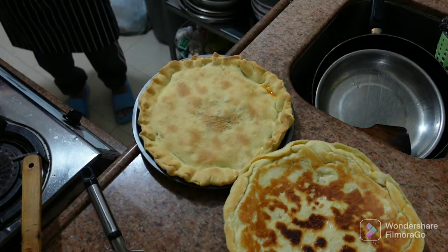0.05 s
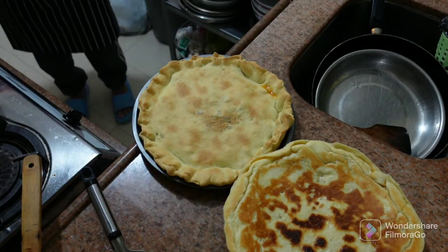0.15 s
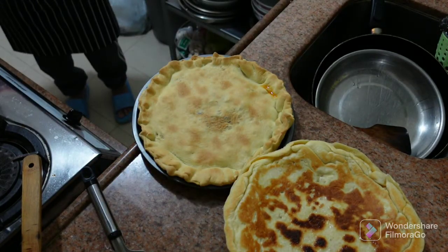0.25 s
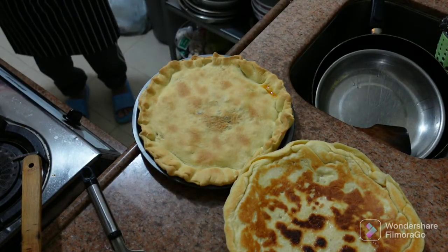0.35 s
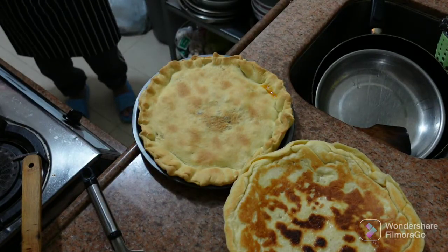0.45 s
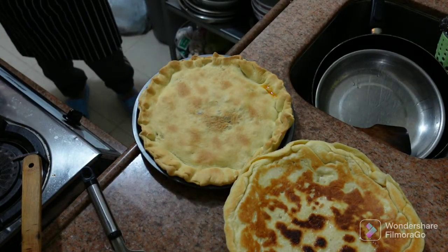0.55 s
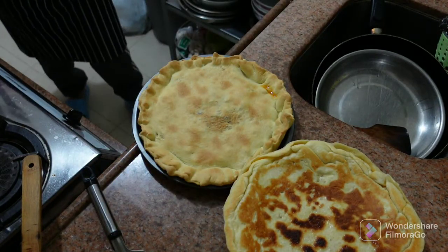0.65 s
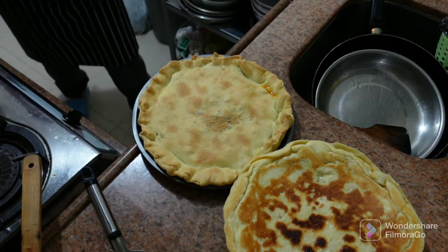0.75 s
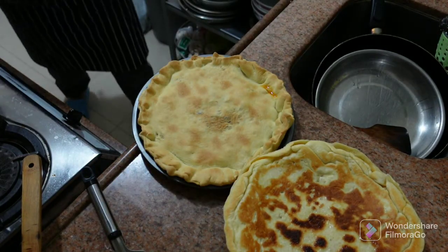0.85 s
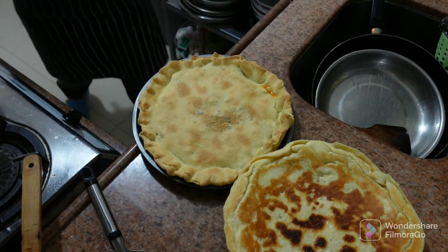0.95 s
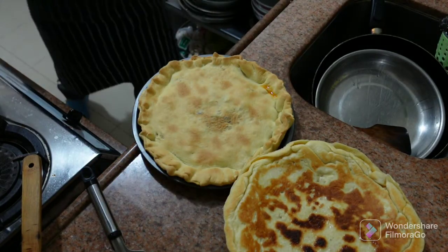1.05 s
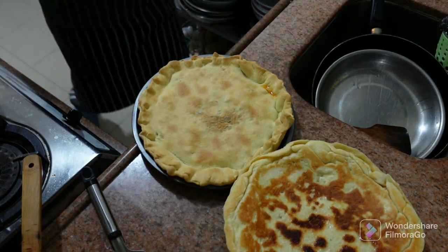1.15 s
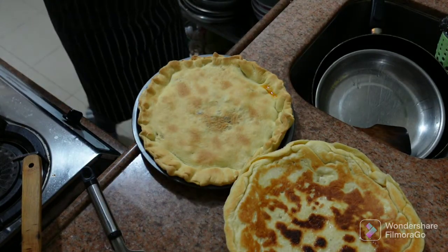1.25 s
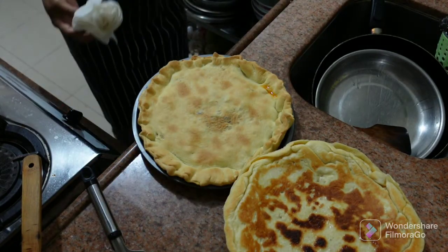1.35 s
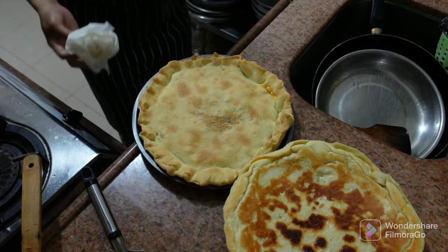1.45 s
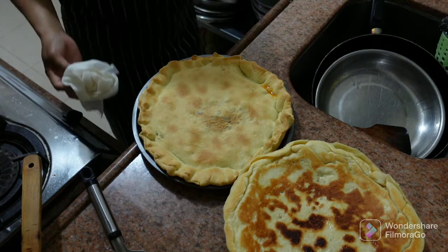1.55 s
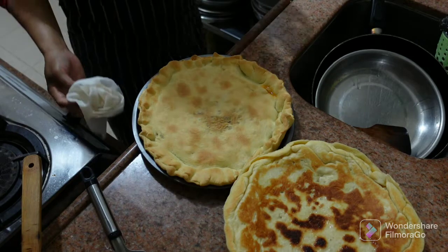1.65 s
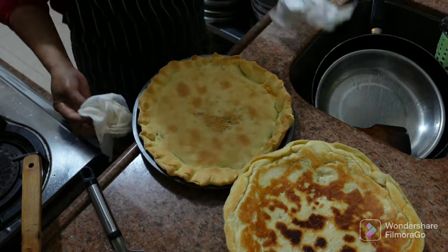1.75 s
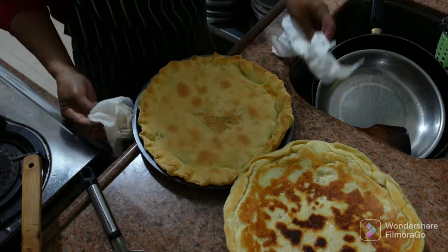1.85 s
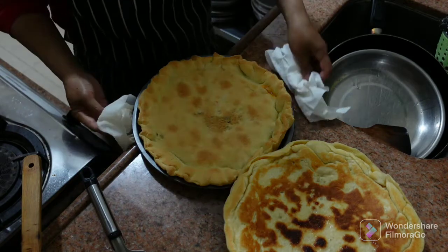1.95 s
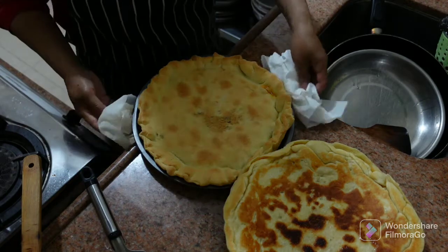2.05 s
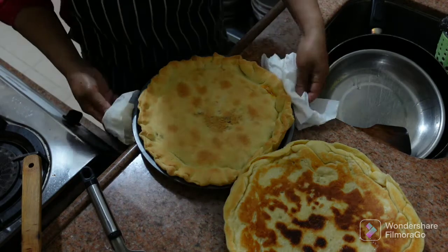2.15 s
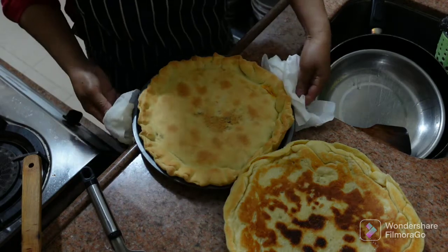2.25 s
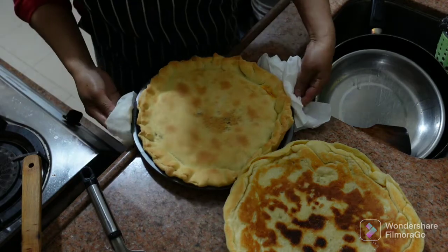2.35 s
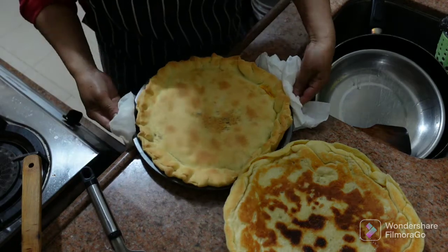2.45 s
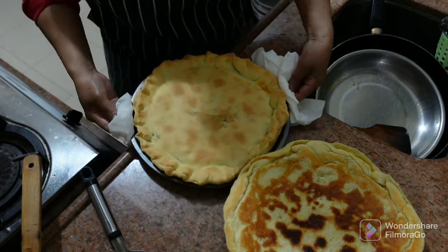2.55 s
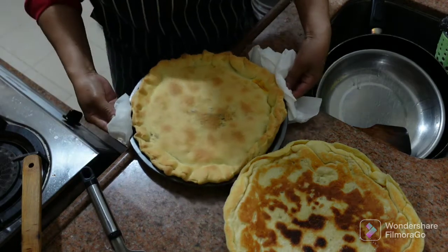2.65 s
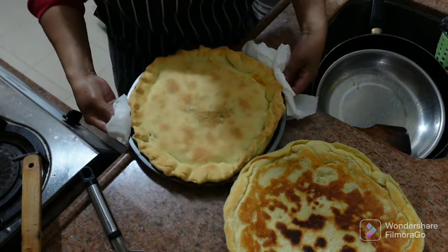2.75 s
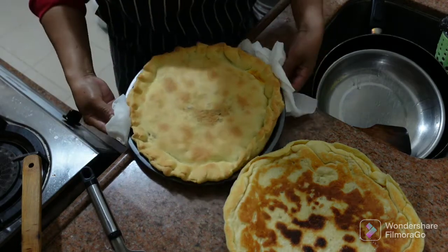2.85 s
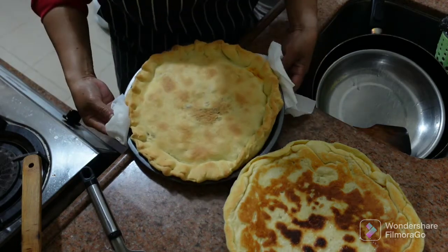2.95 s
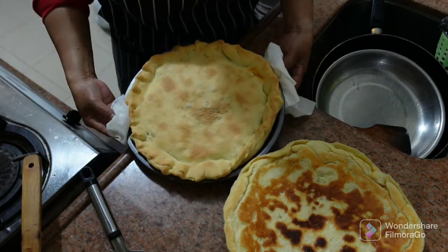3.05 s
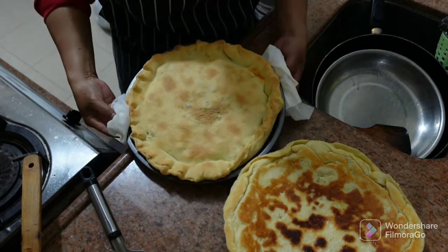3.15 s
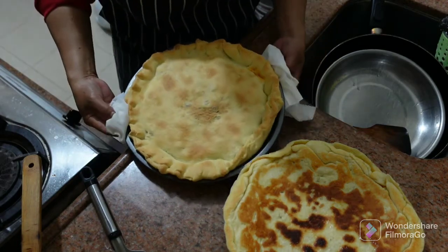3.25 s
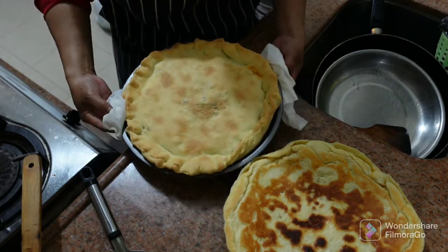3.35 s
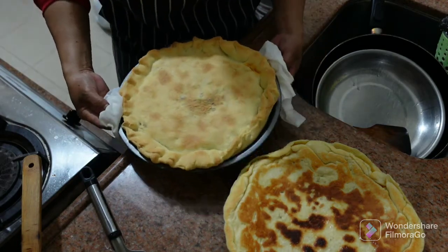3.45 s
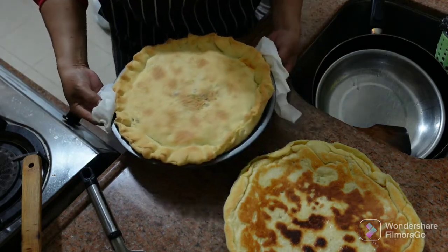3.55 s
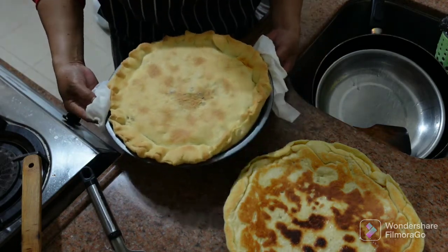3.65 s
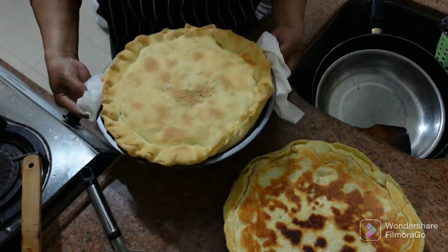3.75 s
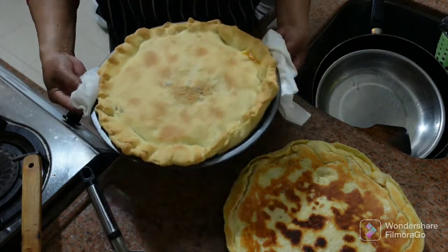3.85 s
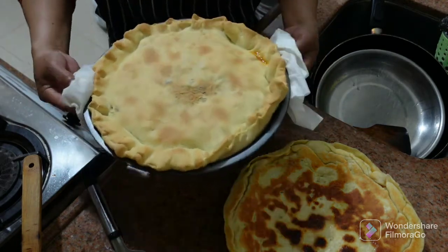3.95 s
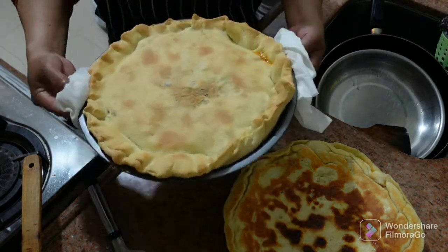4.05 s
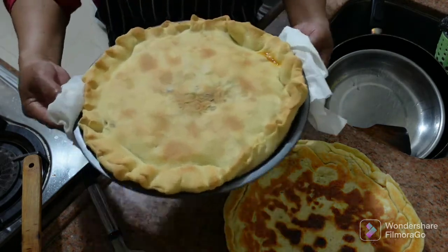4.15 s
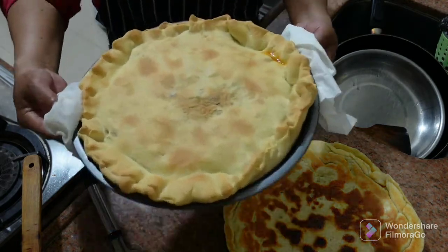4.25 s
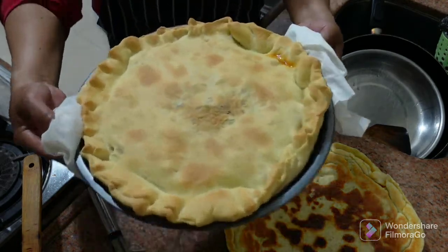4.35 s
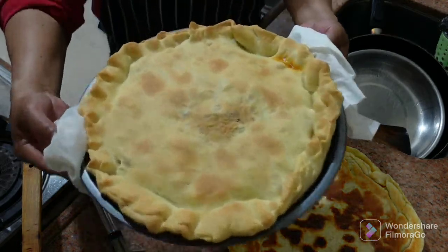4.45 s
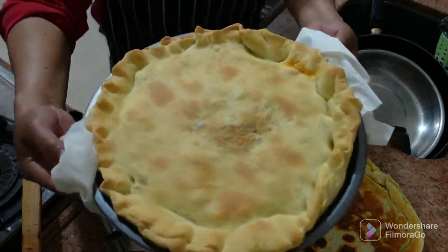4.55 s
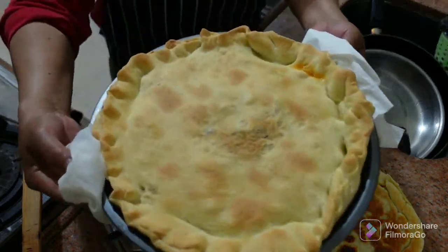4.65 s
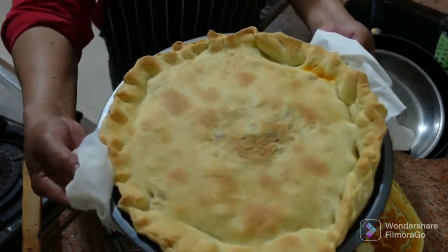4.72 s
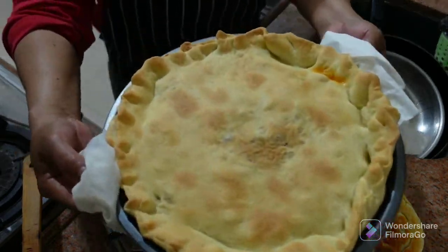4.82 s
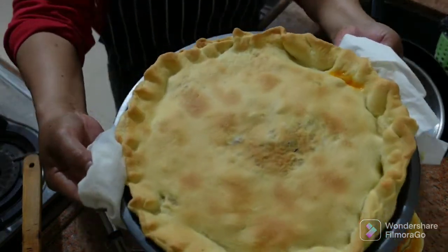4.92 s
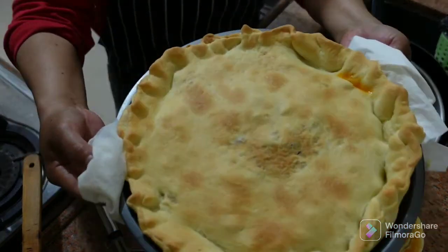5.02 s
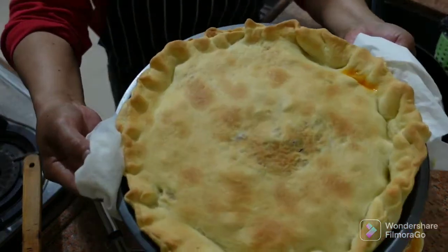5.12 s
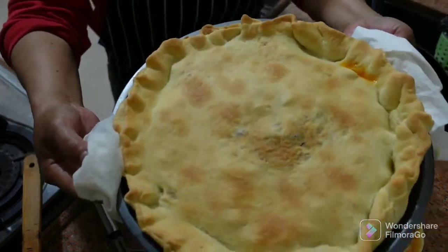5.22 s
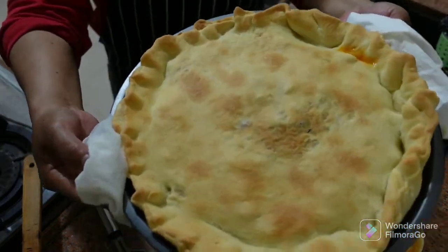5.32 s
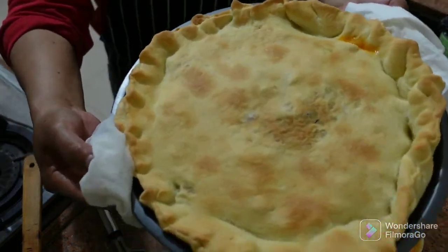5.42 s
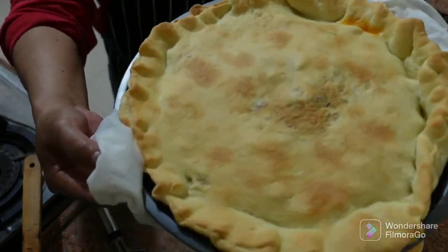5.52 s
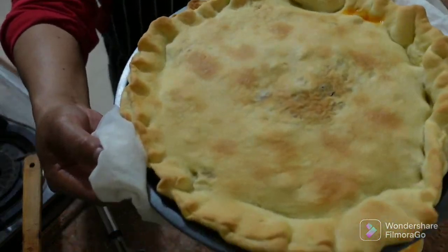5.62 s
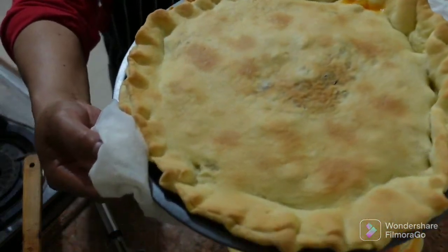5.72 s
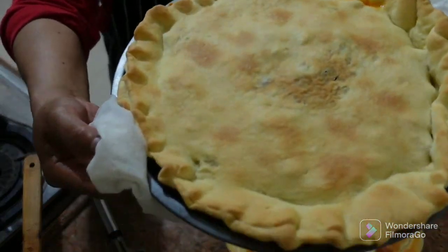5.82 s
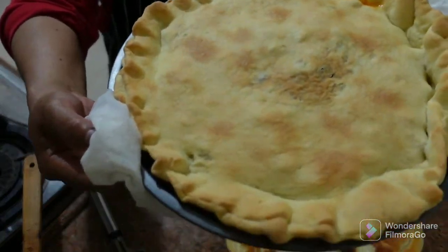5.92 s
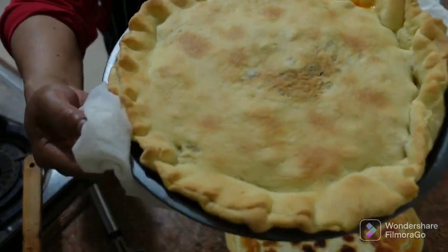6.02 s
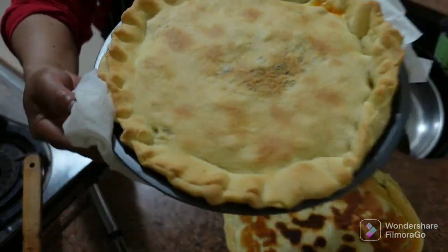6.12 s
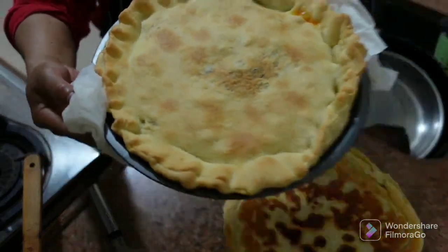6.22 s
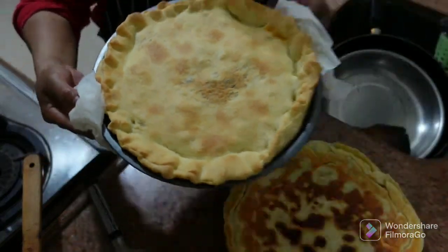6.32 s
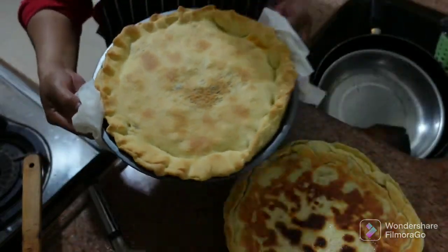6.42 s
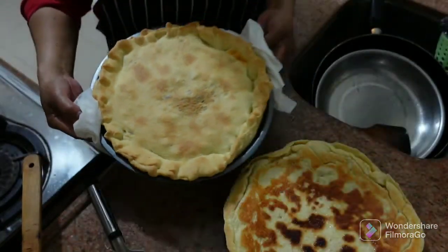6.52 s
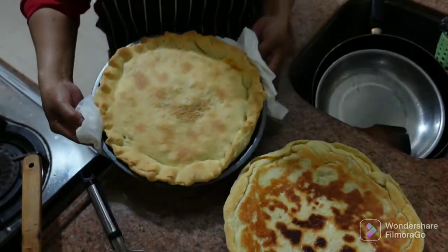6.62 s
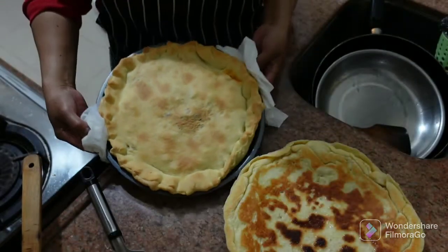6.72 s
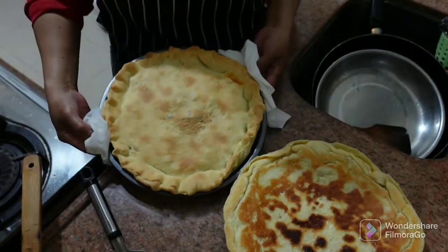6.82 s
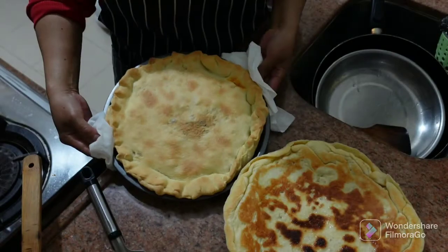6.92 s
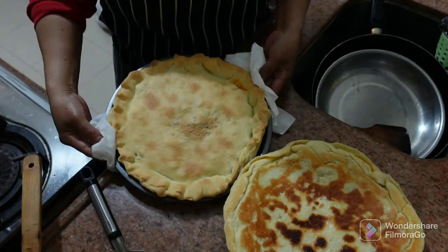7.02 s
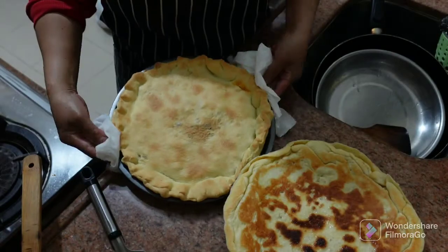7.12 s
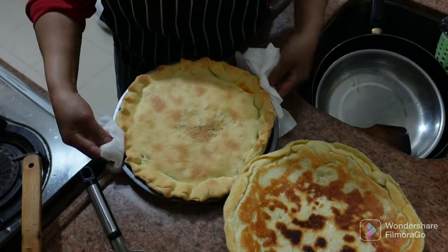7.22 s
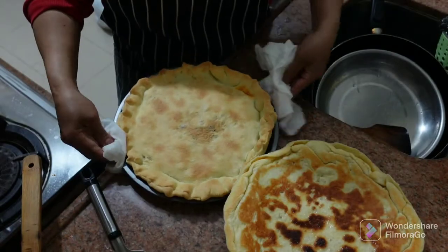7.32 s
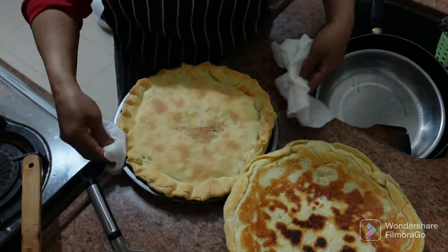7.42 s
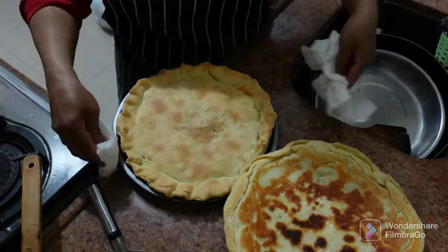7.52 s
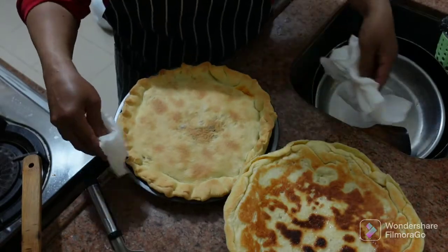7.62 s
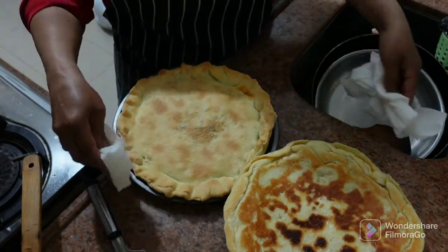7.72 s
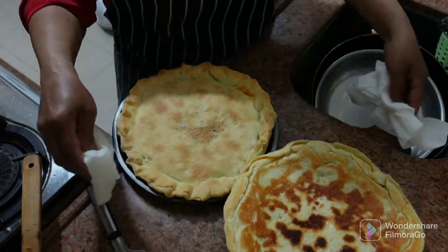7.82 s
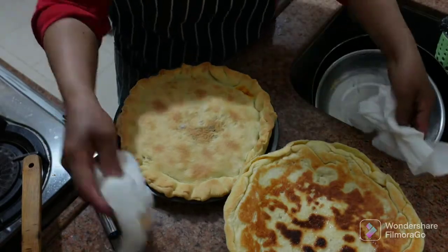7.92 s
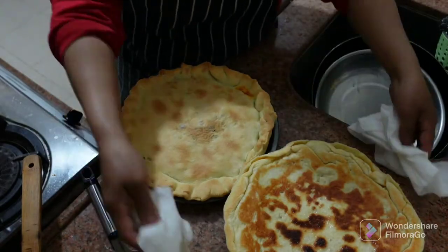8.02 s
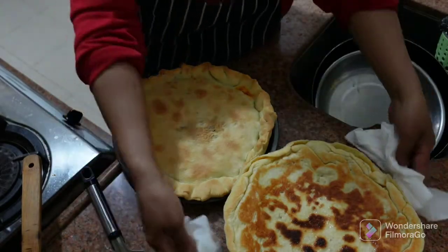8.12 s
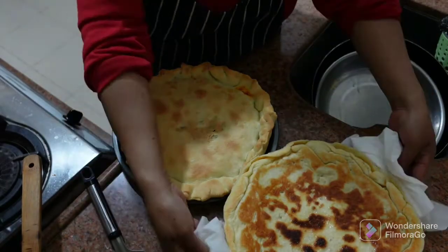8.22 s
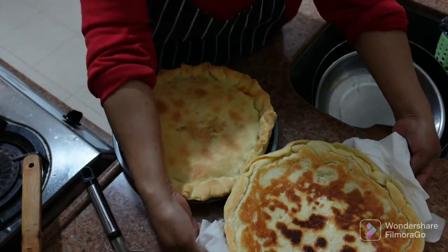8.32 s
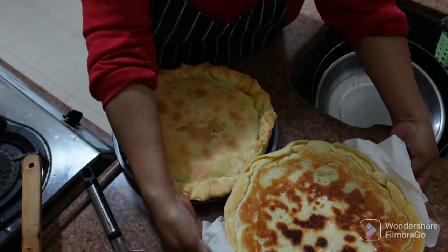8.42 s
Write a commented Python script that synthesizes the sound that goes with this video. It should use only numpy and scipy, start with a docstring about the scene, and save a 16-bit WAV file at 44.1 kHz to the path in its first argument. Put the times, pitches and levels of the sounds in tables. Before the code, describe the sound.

A small kitchen with stone counters, heard close up, with short lively echoes. Soft airy appliance noise and a faint, wavering low hum run throughout, the hum weakening towards the end. The tail of a wooden door bang opens it; at about 0.3 s a cupboard door bangs firmly, a quick double hit with a woody boom, and a faint low ring lingers from 0.5 s. From 0.5 to 2.2 s come quiet, dry slipper scuffs, cloth rubs and tiny bright snaps. A dull tap falls at 2.9 s, light rustles around 3.4-3.7 s, small ticks at 4.3 and 6 s, a snap at 5 s and a very faint rub at 5.7 s. At 6.8 s the filled metal pan strikes stone loudly, chattering brightly, with heavier knocks at 7.0 s. Released, it clacks at 7.4 s, more damped, and once more at 7.8 s; then only the appliance remains until 8.4 s.

```python
"""A kitchen with stone tops: a cupboard door bangs shut and slippers scuff away over an appliance hum.
A filled metal baking pan is lifted with paper napkins, then knocks and chatters on the counter as it is set down.
Pan and door are struck ringing modes with a burst of noise; scuffs are grainy noise in a moving band.
Ticks, taps and snaps are short rings, the appliance is shaped noise and hum, and sparse echoes make the room."""
import sys
import numpy as np
from scipy import signal
from scipy.fft import rfft, irfft
from scipy.io import wavfile
from scipy.ndimage import uniform_filter1d

SR = 44100
rng = np.random.default_rng(int(sys.argv[2]) if len(sys.argv) > 2 else 0)


def persist_wave(psi):
    """Save psi, clipped to +-1, as 16-bit WAV."""
    counts = np.round(np.clip(psi, -1, 1) * 32767).astype(np.int16)
    wavfile.write(sys.argv[1], SR, np.atleast_2d(counts).T)


def boost_factor(decibels):
    """Convert a level in decibels to a linear amplitude factor."""
    exponent = np.asarray(decibels, float) / 20
    return 10 ** exponent


N = 373501  # length of the sound in samples

# pan meeting the stone, rebounds included: (start_s, level_db, favoured_pitch_hz, crack_db, chatter_s)
PAN_KNOCKS = [(6.833, -2.5, 3500, -9.5, 0.069), (6.852, -14.5, 3200, -35, 0.093),
              (6.873, -4.5, 3080, -15, 0.065), (6.998, 1.5, 2360, -16, 0.057),
              (7.047, -1, 2800, -22, 0.012), (7.373, 0, 2230, -22, 0.03), (7.399, -3, 1300, -12.5, 0.06),
              (7.426, -7.5, 2190, -18, 0.068), (7.798, -3.5, 1460, -10, 0.0079),
              (7.82, -18, 2200, -14, 0.034)]
LET_GO_S = 7.3  # the hands leave the rim
# pan modes while the rim is held: (pitch_hz, width_hz, level_db)
HELD_PAN_MODES = [(850, 40, 3), (1014, 50, 12.5), (1330, 30, -11), (1395, 32, 7), (1458, 20, 11.5),
                  (1746, 20, 8.5), (2330, 40, -10), (2400, 28, 8.5), (2420, 31, 10.5), (2730, 20, 4),
                  (2800, 25, 5), (2884, 36, 9.5), (3240, 30, -3), (3240, 26, 2), (3680, 41, 10.5),
                  (3750, 31, 9), (4240, 40, 1.5), (5740, 50, -6), (6000, 50, -9), (6700, 90, -12),
                  (7300, 110, -12)]
# pan modes once the hands let go: (pitch_hz, width_hz, level_db)
FREE_PAN_MODES = [(880, 22, -3.5), (908, 33, -4), (933, 46, -7), (1070, 120, -6), (1264, 70, -13),
                  (1365, 35, -5), (1442, 43, -1.5), (1530, 77, -8), (1580, 170, 4.5), (1720, 45, -16),
                  (2145, 32, -2), (2193, 27, 4.5), (2375, 44, -3), (2600, 76, -27), (2900, 36, -5),
                  (3000, 55, -9), (3720, 60, -12), (4700, 140, -2), (6050, 110, 2)]
# dense small modes of pan and crust, too close to tell apart: (pitch_hz, level_db)
PAN_CRACK = [(300, -6), (900, -12), (1450, -1), (1950, -9.5), (2600, 2), (4300, -6), (4600, -41),
             (5400, -11), (8500, -5.5), (12000, -21), (16000, -103)]
# stone slab under the pan: (pitch_hz, width_hz, level_db against the blow)
SLAB_MODES = [(108.4, 7.6, -34), (226, 156, -5), (419, 23.4, -30.5)]
# cupboard door, one bang still dying away at the start:
# (start_s, level_db, favoured_pitch_hz, crack_db, chatter_s)
DOOR_BANGS = [(-.04, -20, 2220, -12.5, 0.09), (.2678, -9.5, 1790, -6, 0.034),
              (.298, -9.5, 170, -15.5, 0.019)]
# ringing modes of the door: (pitch_hz, width_hz, level_db)
DOOR_MODES = [(123, 5.9, -1), (141.2, 2.3, -17.5), (161, 16, -4.5), (197, 28, -1), (218, 19, 2),
              (290, 2.8, -25), (351, 20, -14.5), (597, 23, 1.5), (740, 53, 1.5), (964, 36, 2),
              (2056, 80, 5), (2500, 420, 4.5), (3200, 200, 2)]
# colour of the door's noisy crack: (pitch_hz, level_db)
DOOR_CRACK = [(200, -24), (470, -11), (640, 4), (1000, 6.5), (2100, 9), (3000, 2.5), (4000, -4), (9000, -8),
              (16000, -31)]
# tiny rebounds: level against the blow in dB, and how many per second on average
PAN_CHATTER_DB, DOOR_CHATTER_DB, CHATTER_PER_S = -12.5, -13, 900
# slippers and cloth dragged in broad strokes: (start_s, length_s, level_db, start_pitch_hz, end_pitch_hz)
STROKES = [(0.502, 0.11, -43.5, 2570, 2500), (0.983, 0.056, -39, 2400, 2900),
           (1.103, 0.076, -39.5, 3850, 3200), (1.195, 0.083, -44.5, 2980, 2500),
           (1.429, 0.17, -43.5, 2920, 6050), (1.87, 0.05, -47.5, 3490, 3500),
           (2.188, 0.11, -39.5, 2500, 4120), (3.388, 0.11, -44.5, 2580, 3440),
           (5.648, 0.39, -53, 3200, 4440)]
STROKE_OCTAVES, STROKE_ATTACK_S = 1.2, 0.004  # octaves from the band's centre to half strength
# short rubs that stay in one band: (start_s, length_s, level_db, pitch_hz, width_octaves to half strength)
RUBS = [(0.795, 0.055, -48, 7500, 0.65), (1.104, .11, -42.5, 1890, 0.68), (1.417, 0.055, -48.5, 680, 0.31),
        (1.772, 0.072, -47, 2500, 0.8), (2.156, 0.052, -40.5, 965, 1), (3.414, 0.073, -46.5, 2200, 0.11),
        (3.42, 0.042, -55, 4650, 0.13), (3.575, 0.16, -53.5, 1574, 0.096), (3.73, 0.028, -48, 5000, .38),
        (6.776, 0.017, -43.5, 4440, .4)]
RUB_ATTACK_S, FADE_SHARE = 0.0017, 0.48  # the fade is a share of the length, for strokes too
# ticks: (start_s, level_db)
TICKS = [(4.29, -33.5), (6.011, -34)]
# short modes of a tick: (pitch_hz, level_db, t60_s)
TICK_RING = [(1890, -5.5, 0.034), (2960, -6, 0.011), (4860, 0, 0.011), (6500, -22, .006)]
# a dull tap: (start_s, level_db)
TAPS = [(2.895, -37.5)]
# modes of the tap: (pitch_hz, level_db, t60_s)
TAP_RING = [(220, -3, 0.074), (930, 3, 0.027)]
# bright snaps: (start_s, level_db)
SNAPS = [(0.807, -40), (1.1046, -34), (1.9667, -34), (3.4439, -37), (4.2889, -35.5), (5.043, -38)]
# very short modes of a snap: (pitch_hz, level_db, t60_s)
SNAP_RING = [(4650, 4, .004), (7500, 4, 0.0023), (9700, -7, .003), (13200, -6, .003)]
# a low ring that sets in after the bang, perhaps a loose oven panel: (start_s, level_db)
AFTER_RING = [(0.52, -39.5)]
# mode of that low ring: (pitch_hz, level_db, t60_s)
PANEL_RING = [(218.5, 0, 2.2)]
# the appliance over time, its hum growing fainter: (time_s, air_noise_db, hum_db)
APPLIANCE_LEVELS = [(0.2, -47.5, -49.5), (0.61, -44.5, -53.5), (4.44, -48.5, -55), (6.69, -49, -68.5),
                    (6.92, -46, -73), (8.47, -49, -66)]
# colour of the air noise: (pitch_hz, level_db per Hz, relative)
AIR_COLOUR = [(18, -55), (30, -26), (90, -7), (165, 1), (252, -5), (499, -12), (801, -8.5), (1130, -7.5),
              (1910, -6), (3400, -10), (5590, -9.5), (14400, -23.5), (15700, -30), (16100, -80)]
# fuzzy steady tones of the appliance: (pitch_hz, width_hz, level_db)
DRONES = [(251.2, 22, -60), (815, 6.1, -67.5), (1260, 7.9, -66.5), (1918, 9.2, -67.5), (2174, 5.2, -66.5)]
# how alike the air noise is left and right: (pitch_hz, likeness from 0 to 1)
AIR_LIKENESS = [(60, 1), (240, 0.52), (950, 0.72), (3770, 0.92), (15000, 0.81)]
# balance of the air noise: (pitch_hz, left_over_right_db)
AIR_BALANCE = [(60, 3.5), (380, -2), (2380, -3), (15000, -1.5)]
# how long the room's echoes last: (pitch_hz, t60_s)
ROOM_DECAY = [(100, 0.54), (400, 0.53), (1500, 0.39), (4000, 0.36), (12000, 0.31)]


def pan():
    """The pan's ring changes when the rim is let go; the slab thuds under every knock."""
    held_knocks = [k for k in PAN_KNOCKS if k[0] < LET_GO_S]
    free_knocks = [k for k in PAN_KNOCKS if k[0] >= LET_GO_S]
    held = struck(held_knocks, HELD_PAN_MODES, PAN_CRACK, PAN_CHATTER_DB,
                  crack_t60=0.018, skirt_db=11, split=0.016)
    free = struck(free_knocks, FREE_PAN_MODES, PAN_CRACK, PAN_CHATTER_DB,
                  crack_t60=0.016, skirt_db=11, split=0.013)
    # a thin plate radiates little below its first modes
    plate = signal.sosfilt(signal.butter(4, 740, "high", fs=SR, output="sos"), held + free)
    t = np.arange(SR // 2) / SR
    thud = sum(boost_factor(db) * np.exp(-np.pi * width * t) * np.sin(2 * np.pi * hz * t)
               for hz, width, db in SLAB_MODES)
    soft_start = np.minimum(t / 0.0098, 1)
    for s, db, *_ in PAN_KNOCKS:
        add(plate, s, boost_factor(db) * thud * soft_start)
    return plate


def door():
    """A wooden panel: lingering low boom, short mid modes."""
    return struck(DOOR_BANGS, DOOR_MODES, DOOR_CRACK, DOOR_CHATTER_DB,
                  crack_t60=0.084, skirt_db=2.0, split=0.0019)


def struck(blows, modes, crack, chatter_db, crack_t60, skirt_db, split):
    """Each blow, with the chatter of tiny rebounds after it, rings the modes and a short dense crack."""
    out, t = np.zeros(N), np.arange(SR) / SR
    mode_hz, width, mode_db = np.transpose(modes).repeat(3, axis=1)[:, :, None]
    # dents and load split each mode into three close lines
    line = np.arange(len(mode_hz))[:, None] % 3 - 1
    mode_hz = mode_hz * (1 + split * (line + rng.uniform(-.15, .15, mode_hz.shape)))
    rings = np.exp(-np.pi * width * t) * np.sin(2 * np.pi * mode_hz * t)
    for s, db, hz, crack_db, chatter_s in blows:
        happens = rng.random(len(t)) < CHATTER_PER_S / SR
        hits = rng.choice([-1, 1], len(t)) * rng.uniform(1.0, 1.44, len(t)) * happens
        chatter_fade = np.clip(1 - t / max(chatter_s, 1e-3), 0, 1) ** .5
        force = boost_factor(chatter_db) * hits * chatter_fade
        force[0] = 1  # the blow itself
        # where the blow lands favours the modes near hz; skirt_db is the loss per octave away
        mode_gain = boost_factor(mode_db - skirt_db * abs(np.log2(mode_hz / hz)))
        ring = (mode_gain * rings).sum(axis=0)
        # every rebound cracks anew
        crack_power = boost_factor(crack_db - 60 * t / crack_t60) ** 2
        fading = signal.fftconvolve(force ** 2, crack_power)[:len(t)]
        burst = rng.standard_normal(len(t)) * np.sqrt(abs(fading))
        # the crack leans towards hz half as strongly
        colour = causal([(f, d - .5 * skirt_db * abs(np.log2(f / hz))) for f, d in crack])
        add(out, s, boost_factor(db) * signal.fftconvolve(force, ring / abs(ring).max()))
        add(out, s, boost_factor(db) * signal.fftconvolve(burst, colour / np.linalg.norm(colour)))
    return out


def scuffs():
    """Grainy friction noise: the band of a stroke slides in pitch, the band of a rub stays put."""
    out = np.zeros(N)
    rows = [(*row, STROKE_OCTAVES, STROKE_ATTACK_S) for row in STROKES]
    rows += [(s, length, db, hz, hz, octaves, RUB_ATTACK_S) for s, length, db, hz, octaves in RUBS]
    for s, length, db, start_hz, end_hz, octaves, attack in rows:
        size = round(length * SR) + 512
        # a new random loudness every 32 samples makes the grain
        grain_db = 4 * rng.exponential(1, size // 32 + 1).clip(0, 3).repeat(32)[:size]
        grit = rng.standard_normal(size) * boost_factor(grain_db)
        hz, t, z = signal.stft(grit, SR, nperseg=256, noverlap=192)
        centre = start_hz * (end_hz / start_hz) ** np.clip(t / length, 0, 1)
        band = 1 / (1 + (np.log2((hz[:, None] + 1) / centre) / octaves) ** 4)
        noise = evened(signal.istft(z * band, SR, nperseg=256, noverlap=192)[1][:size])
        u = np.arange(size) / SR / length  # progress from 0 to 1
        envelope = np.clip(np.minimum(u * length / attack, (1 - u) / FADE_SHARE), 0, 1)
        add(out, s, boost_factor(db) * noise * envelope)
    return out


def ticks():
    """Ticks, taps, snaps and the low after-ring: each kind rings its own few modes."""
    out, t = np.zeros(N), np.arange(SR) / SR
    kinds = [(TICKS, TICK_RING), (TAPS, TAP_RING), (SNAPS, SNAP_RING), (AFTER_RING, PANEL_RING)]
    for rows, modes in kinds:
        ring = sum(boost_factor(db - 60 * t / t60) * np.sin(2 * np.pi * hz * t) for hz, db, t60 in modes)
        for s, db in rows:
            add(out, s, boost_factor(db) * ring)
    return out


def appliance():
    """Air noise in drifting patches, a wavering mains hum and a few fuzzy drones."""
    frames, hz = N // 512 + 5, np.fft.rfftfreq(2048, 1 / SR)
    s, air_db, hum_db = np.transpose(APPLIANCE_LEVELS)
    patches = rng.standard_normal((frames, len(hz))).T
    patches = uniform_filter1d(uniform_filter1d(patches, 30, axis=0), 6, axis=1)
    patches = evened(patches)
    # standing waves of the room
    ripple = 1.3 * evened(uniform_filter1d(rng.standard_normal(len(hz)), size=2))[:, None]
    air = evened(stereo_noise(read(AIR_COLOUR, hz)[:, None] + 1.2 * patches + ripple))
    t, slow = np.arange(N) / SR, np.linspace(0, N / SR, num=1000)
    hum_hz = 102 + 1.04 * np.interp(t, slow, wander(5.48, size=1000))
    hum = np.sin(2 * np.pi * np.cumsum(hum_hz) / SR)
    hum_waver_db = 2.0 * np.interp(t, slow, wander(15, size=1000))
    hum *= np.sqrt(2) * boost_factor(np.interp(t, s, hum_db) + hum_waver_db)
    for f, width, db in DRONES:
        # noise through a narrow resonance
        pole = np.exp((2j * f - width) * np.pi / SR)
        fuzz = signal.lfilter([1], [1, -pole], rng.standard_normal(N))
        hum += boost_factor(db) * evened(fuzz.real)
    air_waver_db = 0.047 * np.interp(t, slow, wander(22, size=1000))
    return boost_factor(np.interp(t, s, air_db) + air_waver_db) * air + hum


def stereo_noise(db):
    """Noise with the level db[bin, frame], partly alike left and right."""
    hz = np.fft.rfftfreq(2048, 1 / SR)
    a, b, c, d = rng.standard_normal(db.shape[::-1] + (4,)).T
    same = np.clip(read(AIR_LIKENESS, hz), -1, 1)[:, None]
    left = a + 1j * b
    right = same * left + np.sqrt(1 - same ** 2) * (c + 1j * d)
    lean = boost_factor(read(AIR_BALANCE, hz) / 2)[:, None]
    z = np.array([left * lean, right / lean]) * boost_factor(db)
    return signal.istft(z, nperseg=2048, noverlap=1536)[1][:, :N]


def kitchen(x, start_s):
    """Sparse echoes of random sign, each band dying at its own speed; partly alike left and right."""
    taps = np.zeros((2, SR))
    # one echo somewhere in every 20 samples
    at = np.arange(round(start_s * SR), SR - 20, 20)
    at = at + rng.integers(0, 20, (2, len(at)))
    np.put_along_axis(taps, at, rng.choice([-1., 1.], at.shape), axis=1)
    hz, t, z = signal.stft(taps, SR, nperseg=256)
    fade = boost_factor(-60 * t / read(ROOM_DECAY, hz)[:, None])
    tail = signal.istft(z * fade, SR, nperseg=256)[1]
    # the left-right difference loses its bass, so the bass is near mono
    tail_hz = np.fft.rfftfreq(tail.shape[1], 1 / SR).clip(1)
    spread = irfft(rfft(tail[1]) / (1 + 400 / tail_hz), tail.shape[1])
    tail = tail[0] + 0.34 * np.array([spread, -spread])
    return signal.fftconvolve(x[None], tail / np.linalg.norm(tail[0]), axes=1)[:, :N]


def causal(points):
    """Short filter with the given colour that never rings ahead of its input."""
    log_gain = np.log(boost_factor(read(points, abs(np.fft.fftfreq(4096, 1 / SR)))))
    return np.fft.ifft(np.exp(np.conj(signal.hilbert(log_gain)))).real[:2048]


def read(points, hz):
    """Value of a spectrum at hz, on a log axis."""
    f, value = np.transpose(points)
    return np.interp(np.log(hz + 1), np.log(f + 1), value)


def evened(x):
    """Scaled to rms 1."""
    return x / np.sqrt(np.mean(x ** 2) + 1e-20)


def wander(per_s, size):
    """Slow random drift of rms 1: sines from 0.3 up to per_s cycles a second, the slow ones strongest."""
    t = np.arange(size) * N / size / SR
    speeds = np.geomspace(.3, per_s, num=20)
    return evened(sum(np.sin(2 * np.pi * (f * t + rng.random())) / np.sqrt(f) for f in speeds))


def add(mix, s, sound):
    """Mixes a sound in at time s; what lies before zero is cut."""
    at = round(s * SR)
    sound = sound[max(-at, 0):]
    part = mix[max(at, 0):][:len(sound)]
    part += sound[:len(part)]


def scene():
    """Pan, door and soft sounds sit a little to the right, without deep bass; the appliance runs beneath."""
    near, far, soft = pan(), door(), scuffs() + ticks()
    # gains in dB: left, then right
    dry = near * boost_factor([[-1.1], [1.1]]) + far * boost_factor([[-.3], [.3]]) + soft * boost_factor([[-.7], [.7]])
    wet = boost_factor(-6.0) * near + boost_factor(-3) * far + boost_factor(-3.5) * soft
    # small things give off no deep bass
    cut = signal.butter(N=6, Wn=95, btype="high", fs=SR, output="sos")
    return signal.sosfilt(cut, dry + kitchen(wet, .006)) + appliance()


def roll_off(x):
    """The treble ends steeply here."""
    return signal.sosfilt(signal.butter(12, 16490, fs=SR, output="sos"), x)


def record(dry):
    """The microphone rounds off the highest peaks."""
    rounded = 0.74 * np.tanh(dry / 0.76)
    return roll_off(rounded)


dry = scene()
out = record(dry)
persist_wave(out)
```